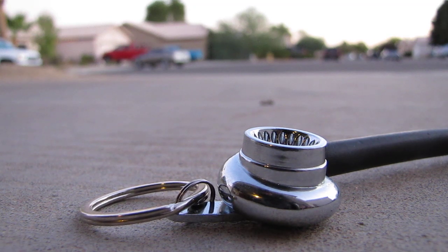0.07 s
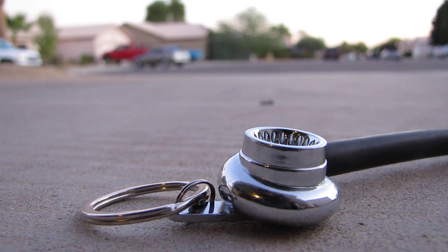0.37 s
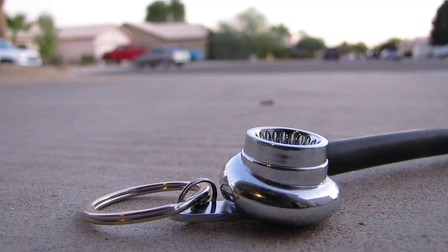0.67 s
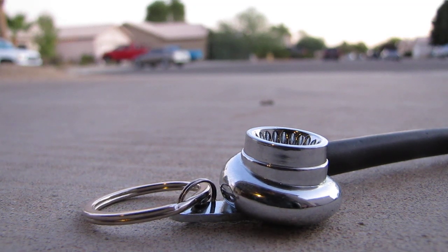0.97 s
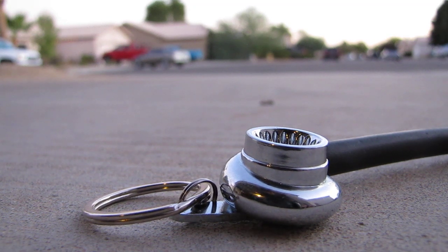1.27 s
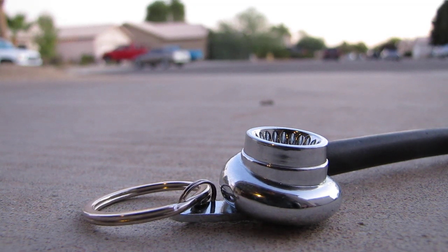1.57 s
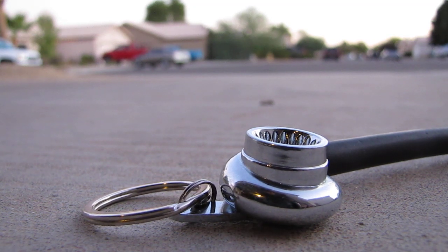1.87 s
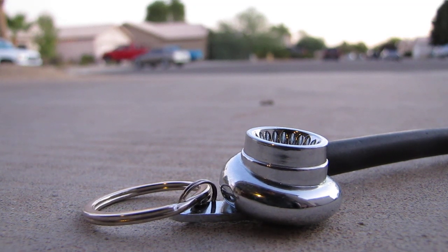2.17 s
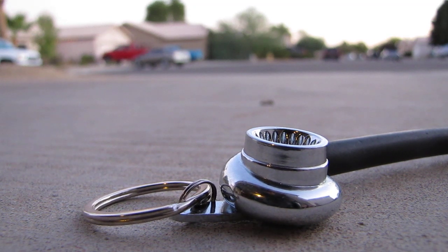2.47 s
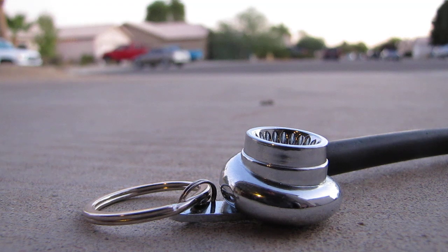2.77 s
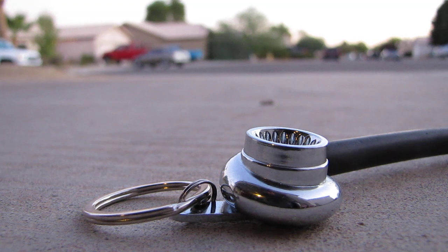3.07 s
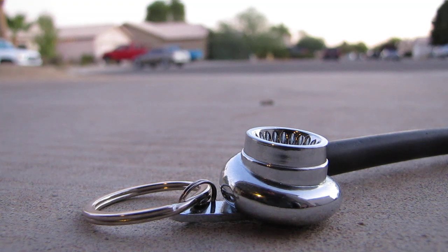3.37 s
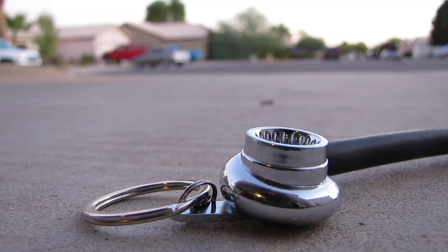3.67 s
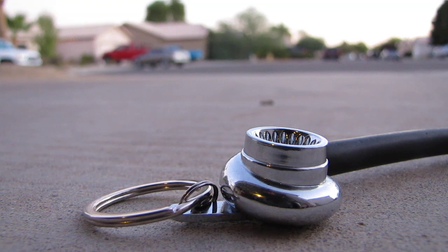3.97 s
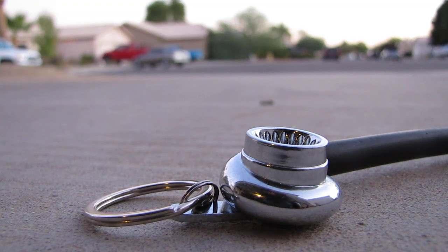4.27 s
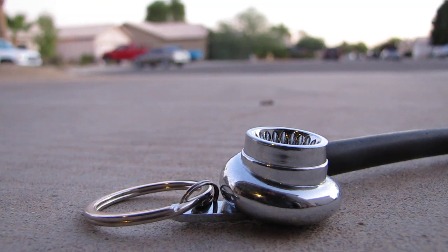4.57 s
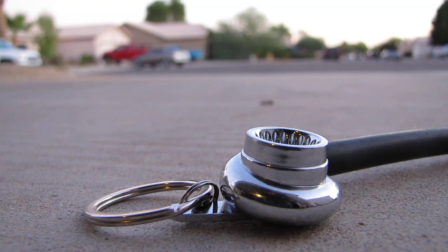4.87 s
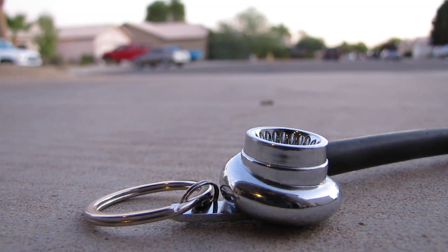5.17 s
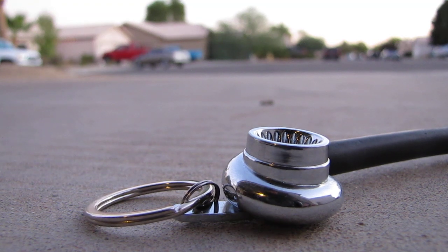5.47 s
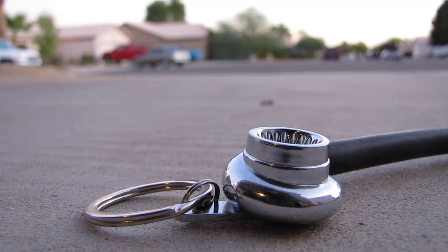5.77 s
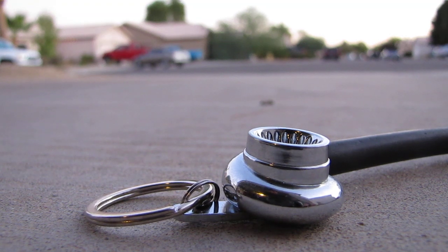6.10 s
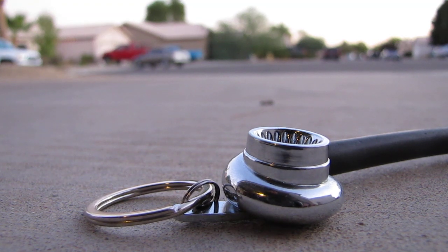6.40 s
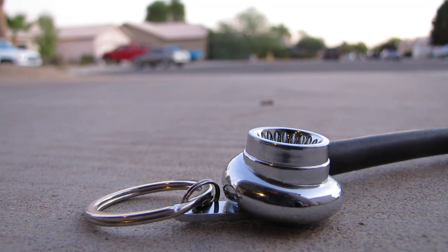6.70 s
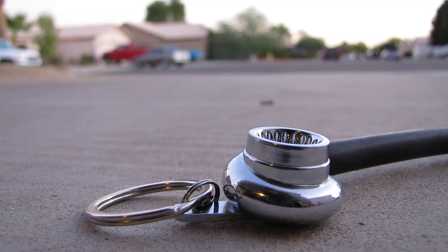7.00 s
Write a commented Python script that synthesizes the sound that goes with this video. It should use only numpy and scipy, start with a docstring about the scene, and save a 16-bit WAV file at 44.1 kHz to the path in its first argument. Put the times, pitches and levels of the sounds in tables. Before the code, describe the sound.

Close by outdoors, air hisses steadily out of a tiny metal turbine while its rotor whistles like a small siren, gradually getting higher. Just before the end the air supply closes: the rush weakens and the whistle turns quieter and slides downward as the rotor coasts. Far in the background, barely audible, traffic rumbles and a vehicle pulls away through its gears.

```python
"""A key-ring toy turbocharger whines on a concrete drive, fed with compressed air through a hose.
Its six blades chop the air like a siren, so the whine climbs as the rotor speeds up, over the rush
of the escaping jet. Near the end the air is shut off and the rotor starts to coast down.
Behind it the street rumbles faintly, and a far vehicle pulls away through its gears."""
import sys
import numpy as np
from scipy import signal
from scipy.fft import rfft, irfft, next_fast_len
from scipy.io import wavfile

SR = 44100
rng = np.random.default_rng(int(sys.argv[2]) if len(sys.argv) > 2 else 0)


def log_audio(samples):
    """Write samples as a 16-bit WAV file to the path given in sys.argv[1]."""
    # one column per channel
    frames = np.atleast_2d(samples).T
    # limit to full scale, then quantise
    limited = np.clip(frames, -1, 1)
    pcm = np.round(limited * 32767).astype(np.int16)
    wavfile.write(sys.argv[1], SR, pcm)


N = 314874
TIME_S = np.arange(N) / SR
FFT_SIZE = next_fast_len(N)
BIN_HZ = np.fft.rfftfreq(FFT_SIZE, 1 / SR)


def from_db(db):
    """Turn decibels into a volume factor."""
    return 10 ** (np.asarray(db) / 20)


def unit_power(x):
    """Scale a signal to an average power of 1."""
    return x / np.sqrt(np.mean(x ** 2) + 1e-20)


def over_time(points):
    """Join (time, value) points with straight lines."""
    return np.interp(TIME_S, *np.transpose(points))


def over_frequency(points):
    """Join (frequency, value) points along a scale of octaves."""
    hz, value = np.transpose(points)
    return np.interp(np.log(np.maximum(BIN_HZ, 1)), np.log(hz), value)


def filtered(x, response):
    """Give each frequency of a sound its own gain and delay."""
    return irfft(rfft(x, FFT_SIZE) * response, FFT_SIZE)[..., :N]


def drift(rate):
    """A random wobble of typical size 1, changing about rate times a second."""
    step, warm_up = 40, 2000   # samples per slow step, steps thrown away
    pole = np.exp(-2 * np.pi * rate * step / SR)
    noise = rng.standard_normal(N // step + warm_up + 2)
    slow = signal.lfilter([1], [1, -2 * pole, pole * pole], noise)[warm_up:]
    return np.interp(np.arange(N) / step, np.arange(len(slow)), unit_power(slow))


def tone(hz):
    """A pure tone of power 1 that follows a pitch curve."""
    return np.sqrt(2) * np.sin(2 * np.pi * (np.cumsum(hz) / SR + rng.random()))


# How alike noise is on the left and right: f/Hz, likeness (1 = the same)
STEREO_LIKENESS = [(80, 1), (330, 0.86), (1200, .97), (6000, 1), (8500, 0.72), (10000, 0.38), (11500, .77),
                   (15000, 0.94)]

def stereo_noise(spectrum):
    """Noise with a given tone colour, less alike on the two sides in the treble."""
    colour = from_db(over_frequency(spectrum))
    alike = np.clip(over_frequency(STEREO_LIKENESS), 0, 1)
    mid = filtered(rng.standard_normal(N), colour * np.sqrt(1 + alike))
    side = filtered(rng.standard_normal(N), colour * np.sqrt(1 - alike))
    return unit_power(np.array([mid + side, mid - side]))


# Tone colour of the rumble: f/Hz, relative level/dB
RUMBLE_COLOUR = [(20, -28), (33, -17), (55, -10), (80, 2), (130, 0.5), (200, -2), (400, -21), (900, -42)]
# Hums in the rumble: f/Hz, level/dB relative to the rumble
STREET_HUMS = [(54, -8), (119, -6.5)]
# How the street swells and ebbs: t/s, level/dB
STREET_LEVEL = [(0, -61), (1, -57), (2, -58), (3.5, -60), (5, -60.5), (6, -66), (7.14, -61.5)]

def street(waver=0.011, swell_db=4.5):
    """Distant traffic makes a low rumble with two wavering hums."""
    out = stereo_noise(RUMBLE_COLOUR)
    for hz, level_db in STREET_HUMS:
        gain = from_db(level_db + swell_db * drift(3.7))
        out += gain * tone(hz * (1 + waver * drift(4.3)))
    return out * from_db(over_time(STREET_LEVEL))


# Each pull of the far engine: start t/s, end t/s, start f/Hz, end f/Hz, level/dB
ENGINE_PULLS = [(4.8, 5.381, 78.2, 99.6, -60), (5.95, 6.5, 72, 87, -60), (6.64, 6.99, 92, 98, -57)]

def vehicle(waver=0.01, fade_s=0.13):
    """Only the exhaust's firing tone carries this far; it climbs in each pull and fades in between."""
    out = 0
    for start, end, from_hz, to_hz, level_db in ENGINE_PULLS:
        throttle = np.clip(np.minimum(TIME_S - start, end - TIME_S) / fade_s, 0, 1)
        hz = np.interp(TIME_S, [start, end], [from_hz, to_hz])
        out += from_db(level_db) * throttle * tone(hz * (1 + waver * drift(11)))
    return out


def valve_shut(half_shut_s=6.75, ease_s=0.0238):
    """The air valve closes quickly but smoothly: 0 is open, 1 is shut."""
    return 0.5 + 0.5 * np.tanh(0.5 * (TIME_S - half_shut_s) / ease_s)


# How often a blade passes while the air is on: t/s, f/Hz
SPIN_UP = [(0.03, 2113), (0.12, 2130), (0.6, 2207), (1.56, 2313), (2.75, 2482), (3.38, 2645), (4.04, 2779),
           (4.82, 2916), (5.53, 3026), (6.07, 3075), (6.55, 3147), (6.64, 3148)]

def blade_rate(friction_per_s=0.43):
    """Blade passes per second: air speeds the rotor up; once the valve shuts, friction slows it."""
    coasting_s = np.cumsum(valve_shut()) / SR
    return over_time(SPIN_UP) * np.exp(-friction_per_s * coasting_s)


# Strength of the air flow while the valve is open: t/s, relative level/dB
AIR_FLOW = [(0.03, -30.5), (0.54, -30), (1.13, -30.5), (1.61, -28.5), (1.7, -29.5), (3.9, -28.5),
            (5.57, -29.5), (5.83, -32), (6.16, -30), (6.64, -31)]

def air_driven_levels(parts, mid_speed_hz=2600):
    """Each part's level in dB: its base (at average flow, mid speed) moved by flow, speed and valve."""
    flow_db = over_time(AIR_FLOW)
    flow_db -= flow_db.mean()
    octaves = np.log2(blade_rate() / mid_speed_hz)
    return [base_db + per_flow * flow_db + per_octave * octaves + shut_db * valve_shut()
            for base_db, per_flow, per_octave, shut_db in parts]


# Tone colour of the escaping air: f/Hz, relative level/dB
AIR_COLOUR = [(120, -27.5), (300, -25.5), (550, -21), (1000, -13.5), (2000, -6), (2800, -5), (3500, 0.5),
              (4500, 0), (5600, -7), (6400, -6), (8800, -11.5), (10100, -11.5), (11700, -19), (15200, -24)]
# The jet's low rush, hiss and top sizzle, one row each:
# base gain/dB, change/dB per dB of flow, change/dB per octave of speed, change/dB when shut
JET_BANDS = [(-21.5, 0.15, -11.5, -5.5), (-22.5, 0.7, -5, -7), (-22, 1.26, 4.5, -10.8)]

def jet(rush_hz=1500, hiss_hz=3800, sizzle_hz=7500, sizzle_top_hz=9500, top_hz=13500,
        turbulence_db=0.58, echo_s=0.0048, echo_db=-19.5):
    """Swirling air leaves the housing: big swirls rush, small ones hiss, and a sizzle rides on top."""
    air = stereo_noise(AIR_COLOUR)
    rush = over_frequency([(rush_hz, 1), (hiss_hz, 0)])
    sizzle = over_frequency([(hiss_hz, 0), (sizzle_hz, 1), (sizzle_top_hz, 1), (top_hz, 0)])
    hiss = 1 - rush - sizzle
    # a surface nearby throws the rush back and makes it slightly hollow
    echo = 1 + from_db(echo_db) * np.exp(-2j * np.pi * echo_s * BIN_HZ)
    out = 0
    for gain_db, band in zip(air_driven_levels(JET_BANDS), (rush * echo, hiss, sizzle)):
        out += filtered(air, band) * from_db(gain_db + turbulence_db * drift(23))
    return out


# The blade tone and its overtones at 2 and 3 times the pitch, one row each:
# base level/dB, change/dB per dB of flow, change/dB per octave of speed, change/dB when shut
WHINE_TONES = [(-17, 0.47, 9.5, -6.5), (-29.5, 1, -24.5, -7.5), (-41, 2.3, -10, -11)]
# Faint tones of the uneven blades, and the highest overtones:
# multiple of the shaft's turning rate, level/dB relative to the blade tone
FAINT_TONES = [(5, -39), (7, -28), (8, -37), (9, -42), (10, -42), (24, -39), (30, -50)]
# The shaft's soft hum: t/s, level/dB
SHAFT_HUM = [(0, -65), (1.1, -56.5), (2.5, -58.5), (4, -58), (6.7, -61.5), (7.14, -75)]

def rotor(blades=6, wander=0.00017, flutter_db=0.41, overtone_flutter_db=0.5):
    """Blades chop the jet like a siren; the rotor's spinning mass keeps the pitch smooth."""
    blade_hz = blade_rate() * (1 + wander * drift(8.8))
    shaft_hz = blade_hz / blades
    tone_db, *overtones_db = air_driven_levels(WHINE_TONES)
    out = from_db(tone_db + flutter_db * drift(23)) * tone(blade_hz)
    for multiple, level_db in enumerate(overtones_db, 2):
        out += from_db(level_db + overtone_flutter_db * drift(13)) * tone(multiple * blade_hz)
    # any unevenness of the blades repeats once a turn
    for multiple, level_db in FAINT_TONES:
        out += from_db(tone_db + level_db) * tone(multiple * shaft_hz)
    # the unbalanced shaft shakes the housing
    return out + from_db(over_time(SHAFT_HUM)) * tone(shaft_hz)


def scene():
    """The toy close by, the street far behind."""
    return rotor() + jet() + street() + vehicle()


# How much louder the left microphone is than the right: f/Hz, level/dB
LEFT_LOUDER = [(200, -0.3), (1400, -1), (2100, -4), (2400, -3.5), (3000, -4.5), (3500, -6), (4200, -5),
               (4800, 1.5), (5800, 0.5), (7000, 2.5), (8200, 5), (9400, 4.5), (10300, 6), (12500, 0)]
# How far the left wave runs ahead of the right: f/Hz, phase/rad
LEFT_AHEAD = [(2000, 0), (3100, 0.15), (4000, 0.23), (4500, 0.46), (5200, 0.076), (6800, 0.16),
              (9200, -0.56), (10000, -0.57), (11900, -2), (15000, -1.84)]

def record(dry, stop_hz=15900):
    """The body around the two microphones shades and delays each in its own way; the top treble is cut."""
    left = from_db(over_frequency(LEFT_LOUDER) / 2) * np.exp(0.5j * over_frequency(LEFT_AHEAD))
    right = 1 / left
    microphones = np.array([left, right]) * 2 / abs(left + right)
    treble_cut = signal.cheby2(20, 70, stop_hz, fs=SR, output="sos")
    return signal.sosfilt(treble_cut, filtered(dry, microphones))


dry = scene()
out = record(dry)
log_audio(out)
```